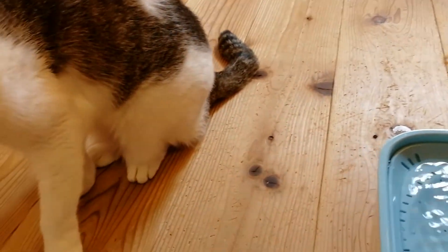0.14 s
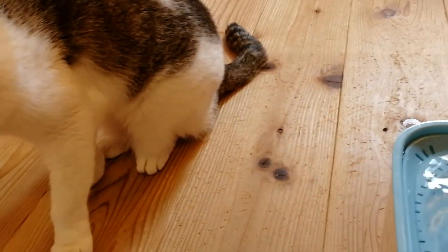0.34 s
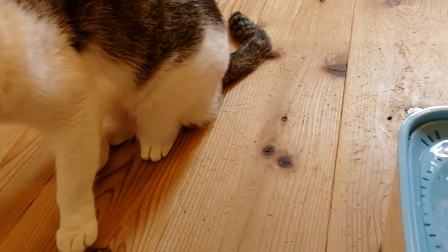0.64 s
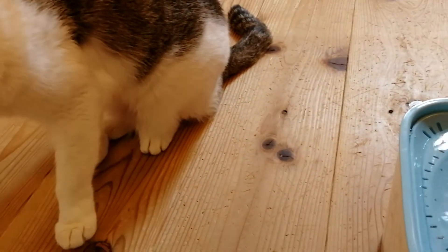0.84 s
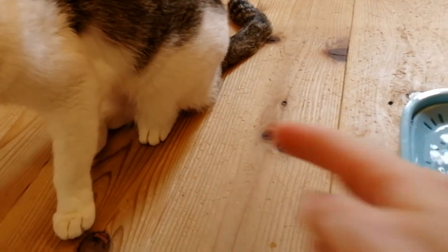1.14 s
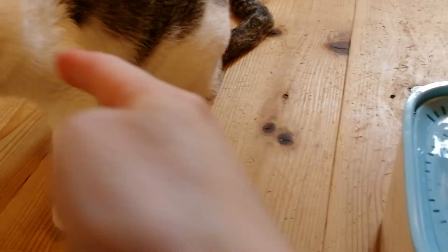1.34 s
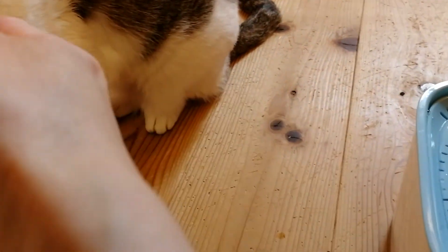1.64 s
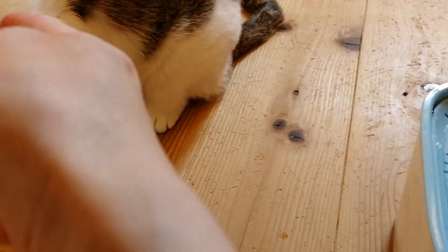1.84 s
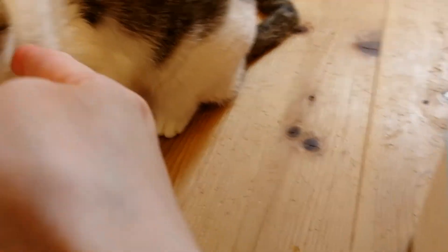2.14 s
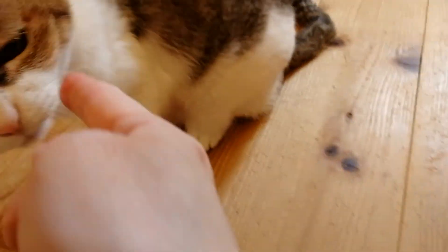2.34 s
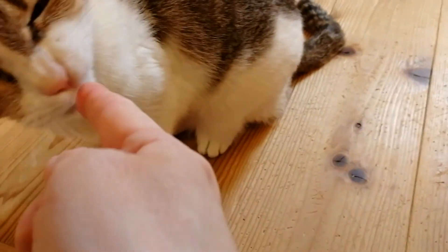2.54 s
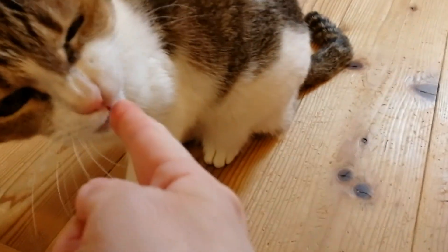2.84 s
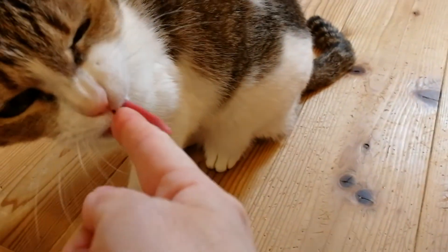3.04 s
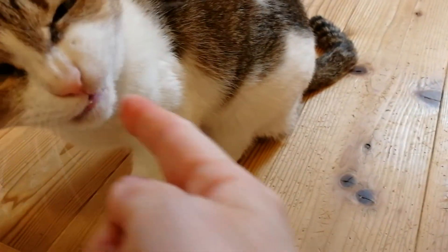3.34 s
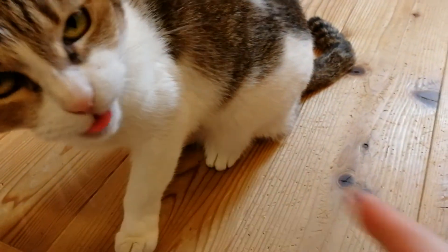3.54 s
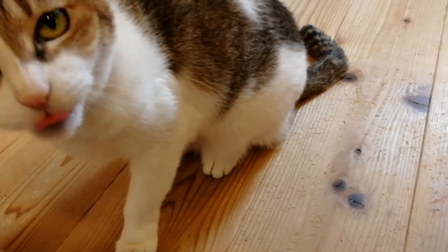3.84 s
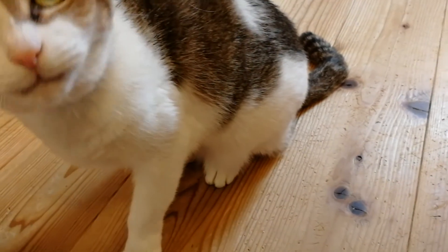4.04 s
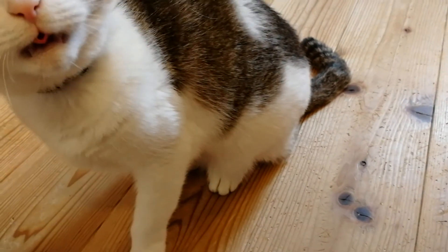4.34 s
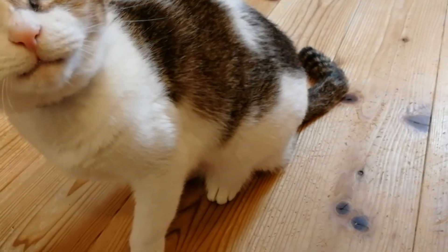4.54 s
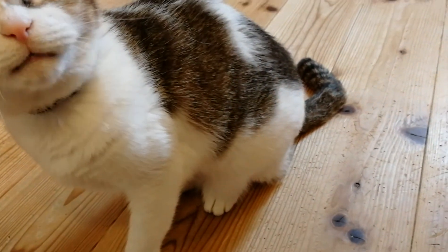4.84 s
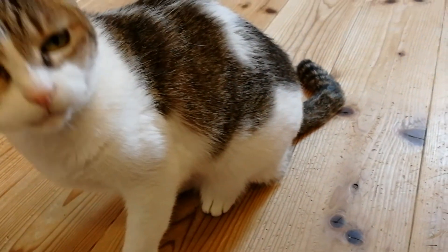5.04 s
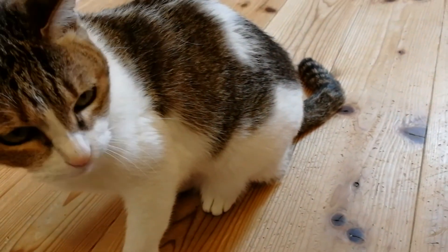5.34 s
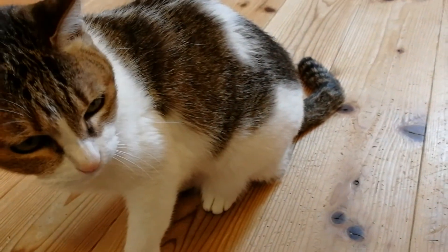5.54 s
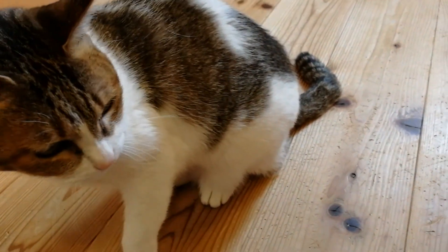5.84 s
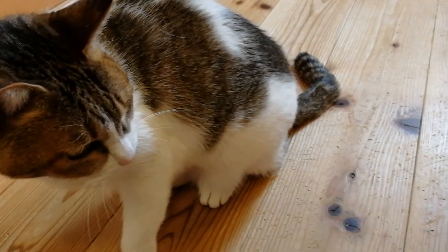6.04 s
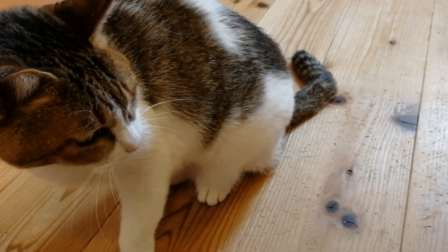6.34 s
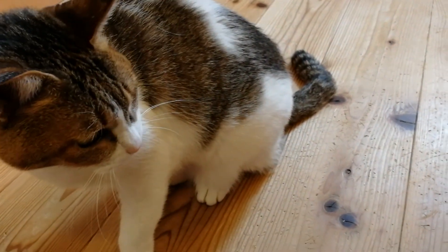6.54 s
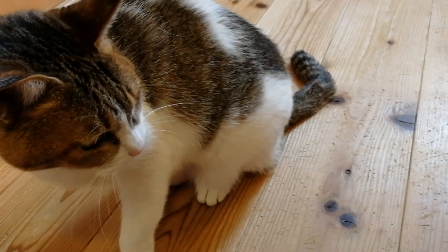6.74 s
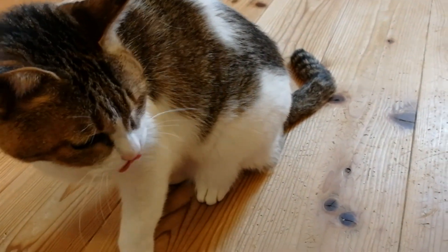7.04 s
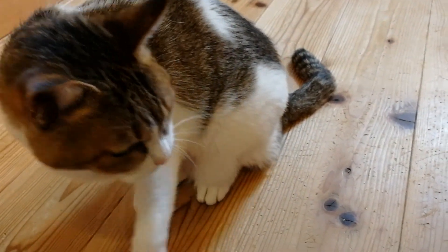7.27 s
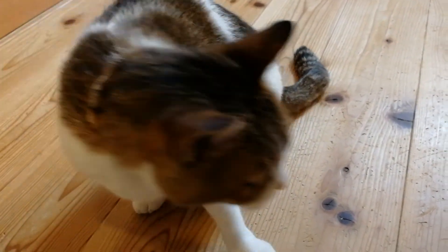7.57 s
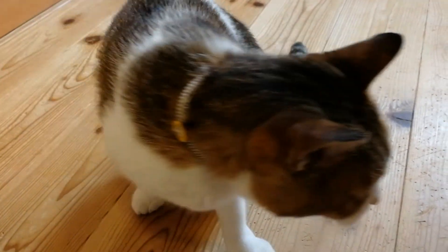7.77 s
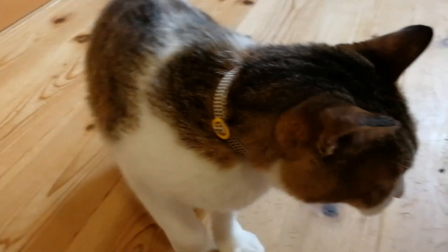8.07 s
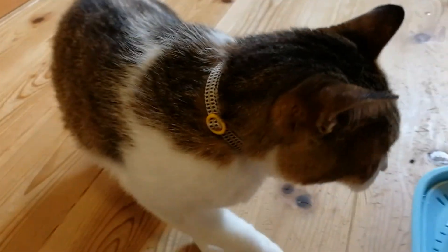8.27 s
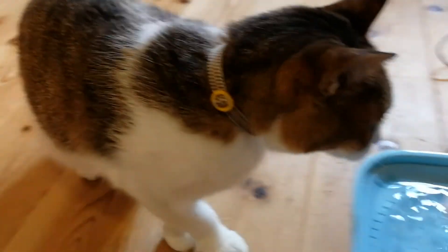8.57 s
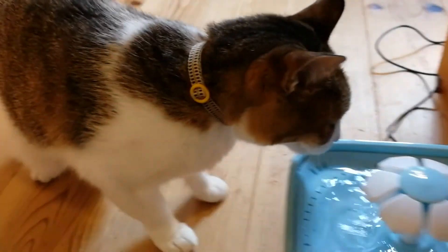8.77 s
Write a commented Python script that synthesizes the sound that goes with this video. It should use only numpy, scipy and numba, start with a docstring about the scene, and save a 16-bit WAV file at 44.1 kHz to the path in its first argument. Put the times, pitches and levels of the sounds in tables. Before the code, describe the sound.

A small pet fountain trickles throughout in a room with a wooden floor. Irregular drops tick and plink into its basin over a thin, bubbly stream, now and then breaking into a tiny splash. One sharper plink stands out about three quarters of the way through. Underneath, the pump hums steadily along with a faint low room rumble. The hand-held phone microphone is close to the water.

```python
"""Water trickles and plinks in a small pet fountain, just right of a hand-held phone in a wooden-floored room.
Each drop ticks on impact and may trap a bubble, which rings briefly as a damped resonator. The stream is
a swarm of such bubbles and now and then breaks into a splash; basin and floor reflect the sound.
Underneath, the pump hums at harmonics of the mains, with a faint whine and the room's low rumble."""
import sys
import numpy as np
from scipy import signal
from scipy.fft import rfft, irfft, next_fast_len
from scipy.io import wavfile
from scipy.ndimage import uniform_filter1d
from numba import njit

SR = 44100
rng = np.random.default_rng(int(sys.argv[2]) if len(sys.argv) > 2 else 0)


def master(y):
    """Save y as 16-bit WAV."""
    cut = np.clip(np.atleast_2d(y).T, -1, 1)
    pcm = np.round(cut * 32767)  # scale
    wavfile.write(sys.argv[1], SR, pcm.astype(np.int16))


N = 392912

# Drops that trap a bubble. Each row: start in seconds, level in dB, pitch in Hz, cycles rung.
PLIPS = [(0.0489,-30,1730,20),(0.109,-33,2300,23),(0.118,-31.5,2900,42),(.223,-32.5,3750,23),(.33,-36,4300,29),(.62,-34,1860,36),(0.8384,-27.5,3800,69),
         (0.977,-26.5,4980,43),(1.0082,-17.5,2170,9.3),(1.1634,-34.5,2590,66),(1.38,-30.5,3730,42),(1.4108,-26,1430,24),
         (1.6096,-35,5260,11),(1.6392,-28,1838,77),(1.6493,-17.5,1780,11),(1.656,-35,5100,16),(1.702,-37.5,6030,30),(1.9391,-25.5,4130,25),
         (1.956,-29,3580,34),(1.9583,-24.5,1766,47),(2.047,-29.5,4500,57),(2.1797,-26.5,2750,13),(2.2938,-34.5,3330,88),
         (2.4184,-30.5,2320,40),(2.4865,-32.5,5630,21),(2.515,-31.5,3850,49),(2.601,-27.5,2100,7.6),(2.958,-32,1880,41),(3.021,-33,2790,60),
         (3.3112,-22.5,2730,21),(3.448,-24,3000,24),(3.603,-30.5,1200,32),(3.659,-30,4150,37),(3.783,-24,4940,8.4),(3.7978,-35,4550,62),
         (3.854,-22,4100,33),(4.0072,-18.5,1830,4.9),(4.0616,-20,2520,24),(4.126,-31,1870,20),(4.2056,-28.5,1125,14),(4.264,-20.5,3840,14),
         (4.294,-36,3600,39),(4.316,-27,4320,50),(4.336,-28.5,2500,18),(4.395,-32,2530,52),(4.404,-31,2410,18),(4.4494,-36,4740,30),
         (4.517,-32,4100,33),(4.548,-41,4240,28),(4.72,-33.5,4320,35),(4.919,-36.5,2400,18),(4.987,-27,1113,27),(5.041,-34.5,3200,43),(5.2612,-26,2410,26),(5.475,-26,3240,13),(5.5432,-30.5,2350,9.9),(5.62,-29,1760,11),
         (5.6765,-33,3190,59),(5.721,-21.5,1810,8.7),(5.8489,-19,3160,24),(6.0102,-24,4220,14),(6.0512,-25,3770,14),(6.125,-29.5,2450,21),
         (6.1398,-32.5,3250,98),(6.156,-27.5,4400,20),(6.196,-40.5,4980,34),(6.204,-18,3040,10.6),(6.4256,-24.5,2470,9.2),(6.441,-15.5,4220,9.1),
         (6.447,-29,2240,14),(6.532,-35.5,2690,43),(6.651,-38,6140,28),(6.6762,-22,2990,30),(6.709,-33,2560,19),
         (6.727,-36,5400,16),(6.761,-20.5,2850,12.6),(6.8561,-18,3200,7.1),(7.0812,-29,2210,14),
         (7.122,-30,4230,61),(7.2784,-27,4020,28),(7.364,-27,2650,15),(7.4143,-30.5,4320,52),(7.593,-32,1800,11),
         (7.6493,-22.5,3750,16),(7.664,-31.5,2540,28),(7.727,-32.5,3080,50),(7.739,-32,4230,59),(7.8592,-23.5,3155,45),(7.97,-29,2980,12),
         (8.213,-30,1086,16),(8.254,-30,3600,37),(8.257,-25.5,2030,7),(8.305,-30,2350,47),(8.35,-24.5,2370,30),(8.4995,-32,3150,12),(8.513,-38,1716,48),(8.622,-35.5,2360,64),(8.683,-26.5,2350,6),(8.715,-29.5,1110,33),(8.757,-28.5,3950,25),(8.838,-35,1860,28),
         (0.131,-35,2325,23),(0.554,-34.5,1937,14),(.573,-34.5,1800,24),(0.754,-36.5,1840,22),(1.337,-36,3000,33),(1.430,-32,2180,18),
         (1.525,-39,3000,48),(1.557,-40,1910,25),(1.885,-32.5,2850,25),(1.920,-42,4680,33),(2.109,-38,6230,13),(2.323,-39,2885,21),(2.339,-37,1690,26),
         (2.684,-35,2070,11),(3.148,-41,2640,44),(3.248,-41,3070,57),(3.373,-32.5,4460,22),(3.505,-35.5,2500,41),(3.729,-33.5,2280,26),(4.021,-37,1800,27),
         (4.151,-33,2830,50),(4.191,-34,3580,52),(4.429,-38,2640,15),(5.155,-35,4091,30),(5.448,-37,2450,32),(5.607,-43,5038,19),(6.096,-33,1990,23),
         (6.191,-36,2440,35),(6.348,-40.5,2700,49),(6.413,-43,5450,32),(6.557,-37,2040,18),(7.573,-39,2454,29),(7.650,-33.5,2520,57),
         (7.717,-39,4240,35),(7.639,-34,3919,40),(7.792,-40,1700,18),(7.805,-44.5,5900,27),(7.892,-34,1790,18),(8.187,-35,1730,21),(8.217,-35,2600,27),(8.228,-35,4521,25)]
# Direction of those bubbles by pitch. Each row: pitch in Hz, left minus right level in dB.
PLIP_PAN = [(1100, 9), (1800, 5), (2500, 4.5), (3700, 16), (4400, -12), (5200, -31)]
# Droplets that trap a tiny, high bubble. Each row: start in seconds, level in dB, pitch in Hz.
PINGS = [(0.182, -14.5, 9160), (0.362, -22.5, 9130), (0.556, -26.5, 13000), (0.619, -33.5, 8000),
         (0.7533, -22, 7980), (0.861, -25, 8500), (0.916, -24.5, 8300), (0.9764, -20, 8300),
         (1.018, -16, 8700), (1.0456, -22, 8700), (1.4411, -16.5, 12300), (1.609, -28, 8600),
         (1.6587, -18, 9000), (1.7035, -19.5, 8860), (1.7817, -26, 8950), (1.886, -33, 8700),
         (1.992, -29, 8800), (2.0396, -36, 8050), (2.4865, -25, 9300), (3.038, -27.5, 6460),
         (3.17, -24, 10750), (3.482, -26, 10200), (3.674, -23.5, 8800), (3.783, -30, 8500),
         (3.881, -25.5, 9100), (4.0269, -23, 9400), (4.078, -11.5, 8440), (4.234, -21, 9600),
         (4.266, -36, 8850), (4.317, -34, 8340), (4.3944, -15, 8300), (4.4504, -25, 9000),
         (4.4628, -11.5, 7570), (4.493, -20, 8500), (4.541, -29, 9000), (4.7752, -27, 11400),
         (5.0243, -37, 9880), (5.0398, -31, 8200), (5.153, -20, 8430), (5.475, -33, 8440),
         (5.5313, -30, 8300), (5.637, -29, 13100), (5.72, -26, 8500), (5.8334, -15, 8800),
         (5.9277, -28, 8900), (5.9888, -28, 8900), (6.0101, -23.5, 8600), (6.1408, -35, 8400),
         (6.205, -24, 8700), (6.337, -26.5, 8340), (6.4372, -18.5, 8700), (6.6531, -21, 5900),
         (6.695, -37, 7840), (6.761, -25, 9200), (6.8551, -43, 8900), (6.9415, -32.5, 9400),
         (6.9965, -26.5, 8100), (7.2078, -38, 12700), (7.2244, -15.5, 8070), (7.2927, -14, 8500),
         (7.3556, -21.5, 8700), (7.416, -25.5, 8700), (7.48, -28.5, 8900), (7.5975, -32, 8200),
         (7.6947, -35, 8400), (7.8594, -36, 7850), (8.1346, -17, 8500), (8.2123, -23, 12500),
         (8.325, -33, 8710), (8.3505, -24, 8500), (8.816, -35, 8640), (8.8387, -19.5, 10900),
         (0.049, -30, 8300), (.336, -32, 9200), (.499, -34, 9200), (.873, -32, 8800), (0.889, -40, 7924),
         (.984, -27, 8700), (1.334, -37, 14500), (1.469, -30.5, 8800), (1.576, -36, 8300),
         (1.582, -35, 9500), (1.789, -27, 9130), (2.515, -25, 8540), (3.273, -35, 8785),
         (3.331, -34, 13000), (3.539, -29.5, 8300), (4.131, -28, 8268), (4.554, -28.5, 7800),
         (4.720, -36, 7850), (4.906, -29, 10400), (5.484, -33, 14000), (5.547, -29, 7924),
         (5.568, -29, 7640), (5.587, -34, 8785), (5.609, -32, 8096), (5.690, -31, 8785), (5.848, -20, 9000),
         (5.868, -27, 7800), (5.898, -32, 9302), (6.026, -26, 8613), (6.388, -32, 8441), (6.397, -33, 8096),
         (6.594, -32, 10163), (6.768, -25.5, 9350), (7.185, -37, 8096), (7.262, -32, 8613),
         (7.876, -29, 8200), (7.983, -31.5, 8800), (8.227, -27, 13092)]
TRAVEL_S, LEFT_LAG_SAMPLES = .001, 18  # from basin to phone; further on to its left opening


def undb(db):
    """Amplitude grows tenfold for every 20 dB."""
    return 10 ** (np.asarray(db) / 20)


def level(x, db):
    """Normalisation: scale a signal to an rms level in dB."""
    return x * undb(db) / np.sqrt(np.mean(x ** 2))


def curve(table):
    """Linear interpolation: rows of (seconds, values..) become one envelope per value column."""
    times, *columns = np.transpose(table)
    return [np.interp(np.arange(N) / SR, times, column) for column in columns]


def colour(x, points):
    """Spectral shaping by (Hz, dB) points joined on a logarithmic frequency axis."""
    hz, db = np.transpose(points)
    size = next_fast_len(N)
    log_hz = np.log(np.arange(size // 2 + 1) * SR / size + 1)
    gain = undb(np.interp(log_hz, np.log(hz), db))
    return irfft(rfft(x, size) * gain, size)[..., :N]


def wander(rate):
    """Slow random modulation: values held for 1 / rate seconds and smoothed twice."""
    hold = int(SR / rate)
    steps = np.repeat(rng.standard_normal(N // hold + 1), hold)
    return 2.05 * uniform_filter1d(uniform_filter1d(steps, hold), hold)[:N]


def ports(x):
    """Level difference between channels: each microphone opening has its own frequency response."""
    # Each row: frequency in Hz, left minus right level in dB.
    imbalance = [(300, 26), (700, -26), (1300, 2), (2600, 4.5), (4000, 2), (5200, -4.5), (8500, -14.5),
                 (11500, 0.5), (13500, 12.5)]
    return np.array([colour(x[k], [(hz, db * (.5 - k)) for hz, db in imbalance]) for k in range(2)])


def room():
    """Low noise: room tone, alike on both sides at long wavelengths, handling rumble and a drone."""
    # Room tone. Each row: frequency in Hz, relative spectral density in dB.
    tone_spectrum = [(12, -43), (20, -10), (43, -22.5), (125, -7), (192, -9), (240, 0.5), (300, -9),
                     (368, -11), (408, -12), (501, -21.5), (756, -27), (912, -13), (1200, -22.5),
                     (1560, -24), (2640, -120)]
    # The hand moves the phone. Each row: time in seconds, level in dB.
    rumble_levels = [(0.0, -83), (2.63, -65), (5.61, -77), (6.4, -63), (6.97, -67.5), (8.91, -62)]
    # A blurred drone near 80 Hz comes and goes. Each row: time in seconds, level in dB.
    drone_levels = [(0.0, -61.5), (3.52, -61), (3.6, -56.5), (5.68, -61.5), (6.65, -56.5), (6.9, -71),
                    (7.84, -58.5), (8.91, -58.5)]
    mid, side, rumble, drone = rng.standard_normal((4, N))
    side = colour(side, [(100, -19), (250, -6.5), (600, 1.5)])
    tone = level(colour(mid + side * np.array([[1], [-1]]), tone_spectrum), db=-51.5)
    rumble = level(colour(rumble, [(15, -14), (30, -28), (55, -7), (90, -49)]), db=0)
    drone = level(colour(drone, [(62, -39), (76, -7.5), (88, -4.0), (108, -36.5)]), db=0)
    return tone + rumble * undb(curve(rumble_levels)[0]) + drone * undb(curve(drone_levels)[0])


def whine(hz=699, rms_db=-77.5):
    """A faint, thin tone wavers under slow amplitude and phase modulation."""
    amplitude = np.sqrt(2) * undb(rms_db + 1.2 * wander(5))
    return amplitude * np.sin(2 * np.pi * hz * np.arange(N) / SR + 0.33 * wander(4))


def pump(mains_hz=59.75):
    """Forced vibration: the motor hums at mains harmonics, each wavering as the impeller loads it."""
    # Each row: harmonic number, rms level in dB, waver in dB, phase lag of the left side in radians.
    harmonics = [(2, -84, 0.63, 1.1), (3, -60.5, 1.64, 0.34), (4, -52, 0.61, 1.18), (6, -59, 0.97, 0.92)]
    # Swell of the strongest harmonic, the fourth. Each row: time in seconds, relative level in dB.
    swell_levels = [(0.0, -49), (0.3, -59.5), (0.79, -49.5), (2.4, -54), (3.85, -58), (5.3, -50.5),
                    (7.0, -48.5), (7.17, -67), (7.37, -51), (8.91, -56)]
    swell_db = curve(swell_levels)[0]
    swell = undb(swell_db - swell_db.mean())
    mains_phase = 2 * np.pi * mains_hz * np.arange(N) / SR
    hum = 0
    for k, db, waver_db, lag in harmonics:
        phase = k * mains_phase + 2 * np.pi * rng.random() + .5 * wander(9.3)
        sides = np.sqrt(2) * np.sin(phase + np.array([[-lag], [lag]]) / 2) * undb([[.9], [-.9]])
        hum = hum + undb(db + waver_db * wander(12)) * (swell if k == 4 else 1) * sides
    return hum


def echoes(water, tail_db=-44, t60_s=.3):
    """Convolution with the room's impulse response: direct sound, early reflections, diffuse tail."""
    # Reflections off basin and floor. Each row: delay in seconds, left gain in dB, right gain in dB.
    reflections = [(.0007, -18, -30), (.0019, -30, -10), (.0037, -18, -12), (.0068, -19, -30)]
    t = np.arange(int(.4 * SR)) / SR
    response = undb(tail_db - 60 * t / t60_s) * (t > .008) * rng.standard_normal((2, len(t)))
    response[:, 0] = 1
    for delay, left_db, right_db in reflections:
        response[:, int(delay * SR)] += undb([left_db, right_db])
    highpass = signal.butter(2, 300, "high", fs=SR, output="sos")  # the water sounds carry no bass below about 300 Hz
    return signal.fftconvolve(signal.sosfilt(highpass, water), response, axes=1)[:, :N]


@njit
def ring(out, start, hz, cycles, glide, left, right, lag, attack):
    """Bubble resonance: a damped sine whose pitch slides, upward when the bubble nears the surface."""
    for k in range(len(hz)):
        life = cycles[k] * SR / hz[k]
        phase = 0.
        for i in range(min(int(life), out.shape[1] - start[k] - lag[k])):
            age = i / life
            phase += min(hz[k] * (1 + glide[k] * (2 * age - .5)) / SR, .45)
            envelope = np.exp(-2 * age) * (1 - age) * min(age / attack, 1.)
            pressure = envelope * np.sin(2 * np.pi * phase)
            out[0, start[k] + lag[k] + i] += left[k] * pressure
            out[1, start[k] + i] += right[k] * pressure
    return out


def bubbles(start_s, db, hz, cycles, glide=0, pan_db=0, lag=LEFT_LAG_SAMPLES, attack=0.055):
    """Superposed damped sines, placed by level and time difference; attack is a share of each life."""
    start = np.clip((start_s + TRAVEL_S) * SR, 0, N - 1).astype(np.int64)
    each = np.ones(len(start_s))
    cycles = np.clip(cycles * each, 1, 80)
    lag = (lag * each).astype(np.int64)
    left, right = undb(db + pan_db / 2), undb(db - pan_db / 2)
    return ring(np.zeros((2, N)), start, hz * each, cycles, glide * each, left, right, lag, attack)


def mist(decay_s=0.008):
    """Exponentially decaying noise: each droplet, and many unheard ones, throws a briefly hissing mist."""
    start_s, db, _ = np.transpose(PINGS)
    faint_when, faint_size = rng.random((220, 2)).T
    faint_db = -54.5 - 8.2 * np.log(np.maximum(faint_size, .12))
    impulses = np.zeros(N)
    np.add.at(impulses, ((start_s + TRAVEL_S) * SR).astype(int), undb(db - 21.5) ** 0.77)
    np.add.at(impulses, (faint_when * N).astype(int), undb(faint_db))
    puffs = signal.lfilter([1], [1, -np.exp(-1 / (decay_s * SR))], impulses)
    hiss = colour(rng.standard_normal((2, N)), [(6000, -10.0), (9500, 8.5), (13000, 4.5), (16000, -7.5)])
    return ports(puffs * level(hiss, db=-10))


def swarm(per_s, low_hz, high_hz, cycles, scatter_db):
    """A random point process: bubbles log-spread in pitch, a few louder than the rest."""
    when, pitch, size, life, side, lag = rng.random((int(per_s * N / SR), 6)).T
    hz = low_hz * (high_hz / low_hz) ** pitch
    db = np.minimum(-scatter_db * np.log(size), 3 * scatter_db)
    glide = 0.14 * life ** 4  # most keep their pitch, a few long ones sweep up
    return bubbles(when * N / SR, db, hz, cycles * (.5 + life), glide,
                   pan_db=22 * (side - .5), lag=2 * LEFT_LAG_SAMPLES * lag)


def stream(uneven_db=1.4):
    """Air entrainment: falling water makes an uneven gurgle and fine spray over a thin hiss."""
    # Each row: time in seconds, gurgle gain in dB, spray gain in dB.
    flow_levels = [(0.0, -51.5, -90), (0.52, -56, -59), (0.79, -49, -49), (0.85, -44.5, -45),
                   (1.05, -49, -50), (1.14, -54.5, -61), (1.49, -54, -54), (2.0, -51.5, -57.5),
                   (2.8, -57, -58), (3.4, -53, -56), (4.0, -51.5, -60), (4.15, -48, -46),
                   (4.26, -48.5, -49.5), (4.8, -53.5, -56), (5.6, -53, -57), (6.92, -51, -53),
                   (7.9, -52, -54), (8.25, -55, -55), (8.54, -52, -58), (8.91, -51, -58)]
    # Colour of the water. Each row: frequency in Hz, relative spectral density in dB.
    spectrum = [(350, -23), (600, 7.5), (758, 10), (906, 1.5), (1280, -6), (1610, -6.5), (1830, 4),
                (2610, 2.5), (3340, 0), (4340, 3.5), (5870, -0.5), (8740, 14), (10700, 3), (13600, 8.5),
                (16000, -31)]
    gurgle_db, spray_db = curve(flow_levels)
    lifted = [(hz, db + 2 * np.log2(hz / 2000)) for hz, db in spectrum]  # small, high bubbles ring louder, about 2 dB more per octave
    gurgle = swarm(per_s=1700, low_hz=1026.7, high_hz=6310, cycles=41, scatter_db=1.9)
    gurgle = level(ports(colour(gurgle, lifted)), db=0)
    spray = swarm(per_s=900, low_hz=4840, high_hz=16700, cycles=13.5, scatter_db=3.2)
    spray = level(ports(colour(spray, lifted)), db=-1.2)
    hiss = colour(rng.standard_normal((2, N)), spectrum)
    hiss = ports(colour(hiss, [(9000, -6), (12000, -20.0)]))
    gurgle *= undb(gurgle_db + uneven_db * wander(14))
    spray *= undb(spray_db + uneven_db * wander(30))
    hiss *= undb(1.7 * wander(9.8))
    return gurgle + spray + level(hiss, db=-63.5)


def splashes(count=520):
    """A cloud of resonating bubbles swells, fades and slides in pitch as the cavity grows."""
    # Each row: start in seconds, length in seconds, base level in dB, first and last pitch in Hz,
    # spread in octaves either way.
    clouds = [(0.0, 0.028, -53, 8100, 7970, 0.048), (0.682, 0.073, -69, 3340, 3350, 0.23),
              (0.817, 0.064, -58.5, 4960, 3710, 0.91), (0.9, 0.065, -78, 7950, 7100, 0.35),
              (1.305, 0.15, -59.5, 2840, 2210, 1.16), (2.953, 0.13, -62.5, 6530, 5560, 1.24),
              (3.258, 0.041, -66, 11100, 11000, 0.45), (3.608, 0.19, -66, 2560, 2570, 1.2),
              (4.125, .105, -56.5, 6340, 2034, 0.85), (6.012, 0.11, -58.5, 6600, 1930, 0.83),
              (6.185, 0.022, -68.5, 2460, 2920, 1.15), (8.182, 0.1, -66, 3150, 3160, 0.93)]
    start_s, length_s, db, first_hz, last_hz, octaves = np.transpose(clouds)[:, :, None]
    when, pitch, size, life, side = np.moveaxis(rng.random((len(clouds), count, 5)), 2, 0)
    hz = first_hz * (last_hz / first_hz) ** when * 2 ** (octaves * (2 * pitch - 1))
    swell_db = 8.6 * np.sin(np.pi * when ** 0.44)
    db = db - 0.71 * np.log(np.maximum(size, .03)) + swell_db
    columns = start_s + length_s * when, db, np.clip(hz, 600, 15000), 39 * (0.1 + life), 57 * (side - .5)
    start_s, db, hz, cycles, pan_db = map(np.ravel, columns)
    return ports(bubbles(start_s, db, hz, cycles, glide=0.024, pan_db=pan_db))


def surfacing_bubbles():
    """A bubble has less water to move as it nears the surface, so its resonance glides upward."""
    # Each row: start in seconds, level in dB, pitch in Hz, cycles rung, upward glide.
    sweeps = [(1.0443, -22.5, 2670, 27, 0.26), (6.696, -5.5, 3920, 39, 0.13), (2.089, -32, 2740, 57, 0.39),
              (6.944, -32, 2500, 51, 0.82), (7.0388, -29, 2640, 50, 0.53), (7.434, -35, 2670, 61, 0.8),
              (7.505, -33, 2570, 50, 0.23), (8.1338, -26, 3100, 50, 0.33)]
    start_s, db, hz, cycles, glide = np.transpose(sweeps)
    return bubbles(start_s, db, hz, cycles, glide, pan_db=6)


def trails(count=4, delay_s=.03, octaves=0.363):
    """Secondary bubbles: each drop falls back as a few more near its own pitch, weaker the later."""
    start_s, db, hz, _ = np.transpose(PLIPS)[:, :, None]
    late, pitch, size, side = np.moveaxis(rng.random((len(PLIPS), count, 4)), 2, 0)
    late = -np.log(1 - .95 * late)  # truncated exponential waiting times
    hz = hz * 2 ** (octaves * (2 * pitch - 1))
    db = db - 12.5 - 9 * late - 4.9 * size
    columns = start_s + .004 + delay_s * late, db, hz, 39 * (.5 + size), 19 * (side - .5)
    start_s, db, hz, cycles, pan_db = map(np.ravel, columns)
    pan_db = pan_db + np.interp(hz, *np.transpose(PLIP_PAN)) / 2
    return bubbles(start_s, db, hz, cycles, glide=0.077, pan_db=pan_db)


def drops(click_hz=6500, click_cycles=2.2):
    """Impact and resonance: a landing drop gives a short, broadband tick, and any trapped air rings."""
    # Sharp impact clicks of drops, some with a gliding bubble. Each row: start in seconds, level in dB.
    impact_clicks = [(0.8061, -31), (0.823, -30), (1.045, -14), (4.3585, -38), (5.1756, -25), (5.2774, -35),
                     (5.3652, -36), (6.697, -7.5), (6.7544, -22), (6.8004, -26), (8.0496, -37),
                     (8.1265, -30)]
    start_s, db = np.transpose(impact_clicks)
    clicks = bubbles(start_s, db, click_hz, click_cycles)

    start_s, db, hz, cycles = np.transpose(PLIPS)
    pan_db = np.interp(hz, *np.transpose(PLIP_PAN)) + 3 * rng.standard_normal(len(hz))
    glide = 0.0037 * cycles - 0.2  # short rings sag, long ones hold or rise
    plips = bubbles(start_s, db, hz, cycles, glide, pan_db, attack=0.03)
    ticks = bubbles(start_s, db - 4.5, hz=8300, cycles=8.1)
    smacks = bubbles(start_s, db - 5.5, click_hz, click_cycles)

    start_s, db, hz = np.transpose(PINGS)
    pings = bubbles(start_s, db, hz, cycles=21.6, glide=0.091, pan_db=4.5 * rng.standard_normal(len(hz)))
    snaps = bubbles(start_s, db - 7, hz=9100, cycles=1)
    return plips + ports(pings + ticks + smacks + clicks + snaps)


def scene():
    """Superposition: the water and its echoes add to the mist, pump, whine and room tone."""
    water = drops() + trails() + surfacing_bubbles() + splashes() + stream()
    return echoes(water) + mist() + pump() + whine() + room()


def record(dry):
    """Band limiting: the phone cuts the treble steeply above 15.9 kHz."""
    return signal.sosfilt(signal.ellip(10, .2, 70, 15900, fs=SR, output="sos"), dry)


dry = scene()
out = record(dry)
master(out)
```